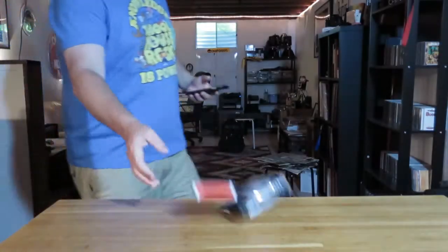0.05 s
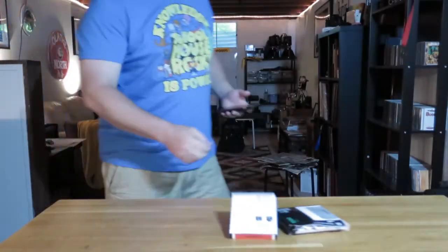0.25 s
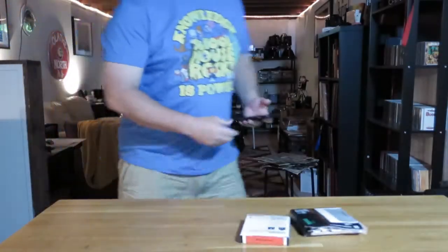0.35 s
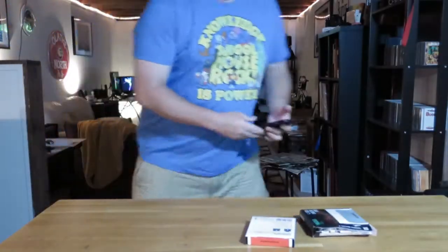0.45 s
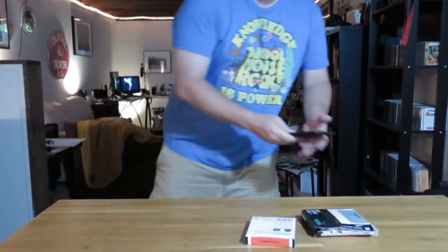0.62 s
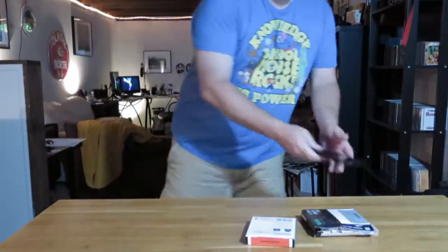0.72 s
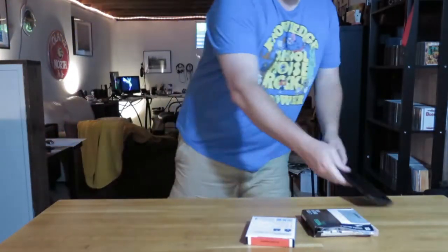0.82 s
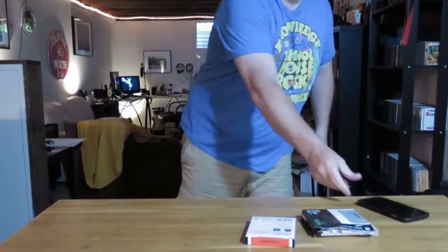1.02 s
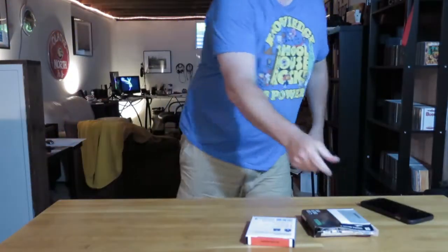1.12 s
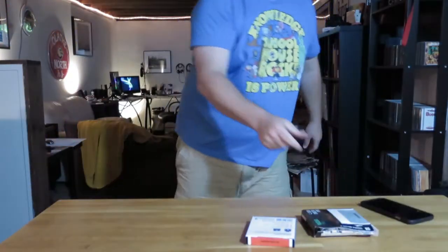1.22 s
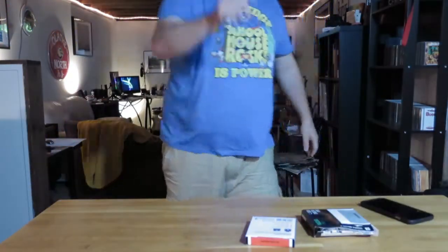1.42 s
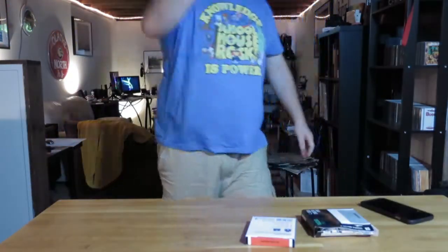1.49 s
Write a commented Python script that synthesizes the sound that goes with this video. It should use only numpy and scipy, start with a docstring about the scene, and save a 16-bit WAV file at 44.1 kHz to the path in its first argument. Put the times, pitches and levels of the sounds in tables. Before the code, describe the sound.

In a quiet, reverberant room, tossed boxes clatter onto a wooden table and a cardboard one falls flat. Then a phone is set on its edge and drops with a hard clack, with soft footsteps behind.

```python
"""Two small boxes land on a wooden table: one clips the top, both slap down, the cardboard one tips flat.
Then a phone is set on its edge, slid a little and let fall. Each contact is a click and a brief rattle,
coloured by the object; boxes and table top ring in damped modes. Behind them: the scuff of the toss,
soft footfalls, a ceiling echo, room reverberation and a quiet room tone."""
import sys
import numpy as np
from scipy import signal
from scipy.fft import rfft, irfft
from scipy.io import wavfile

SR = 44100
rng = np.random.default_rng(int(sys.argv[2]) if len(sys.argv) > 2 else 0)


def generate_wav(sig):
    """Save sig (samples, or channels by samples) to the path in sys.argv[1] as 16-bit PCM at SR."""
    pcm = np.round(np.clip(np.atleast_2d(sig).T, -1, 1) * 32767).astype(np.int16)
    wavfile.write(sys.argv[1], SR, pcm)


N = 68355
T = np.arange(N) / SR
FFT_SIZE = 2 ** 17
HZ = np.maximum(np.arange(FFT_SIZE // 2 + 1) * SR / FFT_SIZE, 1)
CUTOFF_HZ = 16000


# Box contacts. Each row: start in seconds, level in dB, brightness in Hz, rattle re click in dB,
# push on the modes in dB.
BOX_HITS = [(.2028, -21.5, 8970, 12, -22), (.2058, -17, 10010, 9.5, -29.5), (.2124, -25, 15910, 0, -31),
            (.2135, -10, 398, 1, -23), (.2251, -1, 13940, 13, -18), (.2285, -15.5, 9006, 2.5, -23.5),
            (.2311, -1, 2502, 5, 5.5), (.2332, 0, 3500, 2.5, -17), (.335, -19.5, 450, -19, -19),
            (.3375, -30, 15000, 14, -30), (.368, -51, 16000, 15, -43)]
# Clack spectrum. Each row: frequency in Hz, gain in dB.
BOX_EQ = [(25, 5), (70, 16), (130, 15), (230, 16), (400, 20.5), (700, 23.5), (1000, 18), (1550, 26),
          (1900, 19), (2150, 12), (2450, 20.5), (3350, 14.5), (3800, 12), (4150, 16.5), (5100, 10),
          (5800, 13), (6500, 5.5), (9500, 4), (12000, -0.5), (16000, -1.5)]
# Box and table-top resonances. Each row: frequency in Hz, peak gain in dB, T60 in seconds.
BOX_MODES = [(35, 6, 1.6), (146, 10.5, 0.082), (416.8, 27.5, 0.23), (521, 24, 0.074), (683, 19, 0.11),
             (667.5, 32.5, 0.2), (779, 23.5, 0.18), (1198, 22, 0.31), (1415, 26.5, 0.056), (1510, 27, 0.12),
             (1724, 28.5, 0.047), (2433, 22, 0.037), (2920, 20.5, 0.14)]
TABLETOP_MODES = [(77.5, 17, 0.42), (126, 13, .6), (281, 19, 0.34), (296, 18, 0.24), (365.5, 18, 0.42),
                  (550, 7.1, 0.49), (718, 19, 0.38), (750, 11, 0.41), (800, 15, 0.71), (833.5, 17, .3),
                  (1105, 18, .32), (1188, 22, 0.36), (1480, 26, .36), (1569, 25, 0.14)]

def boxes(table_db=-6, ring_room_db=-12):
    """Both boxes slap down, contents rattling; boxes and table top ring."""
    push = blows(BOX_HITS)
    body = ring(push, BOX_MODES)
    table = from_db(table_db) * ring(push, TABLETOP_MODES)
    slaps = clack(BOX_HITS, BOX_EQ, rattle_t60_s=.03, room_db=-2)
    return slaps + body + table + from_db(ring_room_db) * room(body)


# Carton contacts. Each row: start in seconds, level in dB, brightness in Hz, rattle re click in dB,
# push on the modes in dB.
CARTON_HITS = [(.4322, -21, 5000, 10, -20), (.4497, -3, 5000, -6, 0), (.4506, -4, 3000, 4, -18),
               (.4528, -6, 1200, 0, -18), (.4195, -31, 14000, 10, -40), (.444, -32, 16000, 12, -40),
               (.5098, -32, 15000, 12, -40), (.564, -39, 16000, 10, -45)]
# Knock spectrum. Each row: frequency in Hz, gain in dB.
CARTON_EQ = [(30, -22), (100, 3.5), (170, 16.5), (350, 8.5), (600, 17.5), (1000, 10.5), (1700, 13.5),
             (2100, 5.5), (2550, 11.5), (3200, 0.5), (4200, 7), (7000, -3.5), (15000, -6)]
# Carton resonances. Each row: frequency in Hz, peak gain in dB, T60 in seconds.
CARTON_BODY_MODES = [(33.4, 15, 0.69), (293, 16, 0.24), (540, 12, 0.043), (664, 16, .33), (691, 25.8, 0.51),
                     (1594, 21.9, 0.125), (2460, 12, 0.12), (2530, 12, 0.19)]

def carton(ring_room_db=-14):
    """The hollow cardboard box knocks, rocks and falls flat."""
    body = ring(blows(CARTON_HITS), CARTON_BODY_MODES)
    knocks = clack(CARTON_HITS, CARTON_EQ, rattle_t60_s=.025, room_db=-3.5)
    return knocks + body + from_db(ring_room_db) * room(body)


# Phone touches, drop and bounces. Each row: start in seconds, level in dB, brightness in Hz,
# rattle re click in dB, push on the modes in dB.
PHONE_CONTACTS = [(1.008, -34, 2420, 14, -29), (1.0475, -44, 5960, 16, -35), (1.1394, -17, 2800, 6, -20),
                  (1.1478, -22, 1200, 0, -28), (1.1644, -6, 10100, 11, -53.5), (1.1682, 1.5, 1660, 3.5, 2),
                  (1.1738, -5.5, 3950, 34, -20.5), (1.1754, 0.5, 12600, 1, -29)]
# Clack spectrum. Each row: frequency in Hz, gain in dB.
PHONE_EQ = [(30, -25), (80, -5), (170, -2), (240, -6.5), (330, 6), (800, 6), (1150, 1), (1600, 3),
            (2100, 1), (2900, -2.5), (4900, 4), (6300, -4), (9500, -6), (15000, -20.5)]

def phone(ring_room_db=-12):
    """The hard, heavy phone clacks and sets the table top ringing."""
    table = ring(blows(PHONE_CONTACTS), TABLETOP_MODES)
    clacks = clack(PHONE_CONTACTS, PHONE_EQ, rattle_t60_s=.0065, room_db=2, t60_scale=.91, tail_hz=6200)
    return clacks + table + from_db(ring_room_db) * room(table)


# Friction envelope. Each row: time in seconds, relative level in dB.
SLIDE_ENVELOPE = [(1.009, -49), (1.04, -65), (1.06, -54), (1.11, -55.5), (1.14, -59)]
# Friction spectrum. Each row: frequency in Hz, gain in dB.
SLIDE_EQ = [(100, -17), (500, 13.5), (1000, 9), (1600, 14.5), (2800, -1), (5000, -6.5), (8000, -12),
            (15000, -21)]

def slide(grain_db=4, gain_db=-13.5):
    """The phone's edge scrapes faintly over the wood: gated, grainy noise."""
    times_s, levels_db = np.transpose(SLIDE_ENVELOPE)
    grains = rng.standard_normal(N) * from_db(grain_db * rng.standard_normal(N))
    envelope = from_db(np.interp(T, times_s, levels_db) + gain_db)
    sliding = (T > times_s[0]) * (T < times_s[-1])
    return colour(grains / grains.std() * envelope * sliding, SLIDE_EQ)


# Scuffs. Each row: start in seconds, level in dB, brightness in Hz, rattle re click in dB.
SCUFF_HITS = [(.0, -29.5, 13660, 13.5), (.0112, -32, 5030, 0.5)]
# Scuff spectrum. Each row: frequency in Hz, gain in dB.
SCUFF_EQ = [(60, -7.5), (300, 9), (540, 18), (850, 3.5), (1500, 6), (2200, 1.5), (3500, 0), (6000, -0.5),
            (15000, -12)]

def toss():
    """Cardboard scuffs off the fingers, farther back in the room."""
    return clack(SCUFF_HITS, SCUFF_EQ, rattle_t60_s=.023, room_db=5)


# Footfalls. Each row: start in seconds, level in dB, brightness in Hz, rattle re click in dB.
STEP_HITS = [(.829, -5, 89, -6), (1.105, -14.5, 100, -7), (1.509, -20, 422, 7.5)]
# Thud spectrum. Each row: frequency in Hz, gain in dB.
STEP_EQ = [(15, -14.5), (40, 6), (100, -2.5), (220, -9.5), (480, 7.5), (1500, -34), (8000, -31)]

def steps():
    """Dull thuds of feet on the floor."""
    return clack(STEP_HITS, STEP_EQ, rattle_t60_s=.046, room_db=-3.5)


def clack(hits, eq, rattle_t60_s, room_db, t60_scale=1, tail_hz=CUTOFF_HZ):
    """Contacts and their reverberation, coloured by the object."""
    force = contacts(hits, rattle_t60_s)
    reflections = ceiling(force) + reverb(hits, t60_scale, tail_hz)
    return colour(force + from_db(room_db) * reflections, eq)


def contacts(hits, rattle_t60_s):
    """Each contact is a click and a brief rattle, both duller when the touch is soft."""
    force = np.zeros(N)
    click = T == 0
    for start_s, level_db, bright_hz, rattle_db, *_ in hits:
        rattle_gain = from_db(rattle_db)
        rattle = rattle_gain * rng.standard_normal(N) * decay(rattle_t60_s)
        pulse = (click + rattle) / np.hypot(1, rattle_gain)
        force += from_db(level_db) * delayed(lowpass(pulse, bright_hz), start_s)
    return force


def blows(hits):
    """Pulses that drive the modes: weak from a corner, strong from a flat face."""
    return sum(from_db(push_db) * delayed(lowpass(T == 0, bright_hz), start_s)
               for start_s, _, bright_hz, _, push_db in hits)


def ring(force, modes):
    """Parallel resonances, each with its own peak gain and decay."""
    out = np.zeros(N)
    for hz, peak_db, t60_s in modes:
        r = np.exp(-np.log(1000) / (t60_s * SR))
        feedback = [1, -2 * r * np.cos(2 * np.pi * hz / SR), r * r]
        out += from_db(peak_db) * (1 - r * r) / 2 * signal.lfilter([1, 0, -1], feedback, force + 1e-18)
    return out


def room(x):
    """Ceiling echo and reverberation of a ringing body."""
    impulse_response = reverb([(0, 0, CUTOFF_HZ)])
    return ceiling(x) + signal.fftconvolve(x, impulse_response)[:N]


def ceiling(x, delay_s=.0079, gain_db=-10.5, lowpass_hz=3500):
    """One dull echo off the low ceiling."""
    return from_db(gain_db) * delayed(lowpass(x, lowpass_hz), delay_s)


# Room decay. Each row: band centre in Hz, base T60 in seconds.
ROOM_BANDS = [(60, 0.54), (250, 0.56), (650, 0.56), (1500, 0.43), (3000, 0.42), (6000, 0.38), (10000, 0.46),
              (16000, 0.3)]
# Reverberation spectrum. Each row: frequency in Hz, gain in dB.
ROOM_EQ = [(40, -11), (200, -8.5), (600, -4.5), (1500, -5.5), (5000, -7.5), (15000, -4)]

def reverb(hits, t60_scale=1, tail_hz=CUTOFF_HZ, predelay_s=.0049, build_s=.0014, early_db=-1):
    """Each contact feeds early reflections and a diffuse tail whose treble dies first."""
    noise_spectrum = rfft(rng.standard_normal(N), FFT_SIZE)
    build = 1 - np.exp(-T / build_s)
    early = from_db(early_db) * decay(t60_s=.14)
    out = np.zeros(N)
    for hz, t60_s in ROOM_BANDS:
        band = at_hz([(centre_hz, centre_hz == hz) for centre_hz, _ in ROOM_BANDS], HZ)
        late = decay(t60_s * t60_scale) / np.hypot(1, hz / tail_hz)
        hit_energy = build ** 2 * (early ** 2 + late ** 2)
        energy = np.zeros(N)
        for start_s, level_db, bright_hz, *_ in hits:
            gain = from_db(level_db) / (1 + (hz / bright_hz) ** 2)
            energy += gain ** 2 * delayed(hit_energy, start_s + predelay_s)
        out += irfft(noise_spectrum * band)[:N] * np.sqrt(energy)
    return colour(out, ROOM_EQ)


# Room tone spectrum. Each row: frequency in Hz, gain in dB.
ROOM_TONE_EQ = [(25, -45), (60, -53), (125, -52.5), (200, -58.5), (500, -62), (1000, -71), (1600, -69),
                (2100, -71), (4500, -74), (7000, -81.5), (15000, -90)]

def room_tone():
    """Quiet, steady noise, strongest in the bass."""
    return colour(rng.standard_normal(N), ROOM_TONE_EQ)


def colour(x, eq):
    """Minimum-phase filter with the given spectrum."""
    cepstrum = irfft(np.log(from_db(at_hz(eq, HZ))))
    cepstrum[1:FFT_SIZE // 2] *= 2
    cepstrum[FFT_SIZE // 2 + 1:] = 0
    return irfft(rfft(x, FFT_SIZE) * np.exp(rfft(cepstrum)))[:N]


def lowpass(x, hz):
    """Two-pole low-pass."""
    r = np.exp(-2 * np.pi * hz / SR)
    return signal.lfilter([(1 - r) ** 2], [1, -2 * r, r * r], x + 1e-18)


def decay(t60_s):
    """Exponential decay of unit energy."""
    envelope = np.exp(-np.log(1000) * T / t60_s)
    return envelope / np.sqrt(np.sum(envelope ** 2))


def delayed(x, delay_s):
    """Delay, cut to N samples."""
    return np.concatenate([np.zeros(int(delay_s * SR)), x])[:N]


def at_hz(points, hz):
    """Interpolate on a log-frequency axis."""
    points_hz, values = np.transpose(points)
    return np.interp(np.log(hz), np.log(points_hz), values)


def from_db(db):
    """Decibels to gain."""
    return 10 ** (np.asarray(db) / 20)


def scene():
    """Objects and footfalls over room tone, mono."""
    return (toss() + boxes() + carton() + phone() + slide() + steps() + room_tone())[None]


def record(dry, clip_level=.52):
    """Soft clip, then a steep low-pass."""
    rounded = dry / (1 + (dry / clip_level) ** 4) ** (1 / 4)
    top_cut = signal.ellip(10, .1, 80, CUTOFF_HZ, fs=SR, output="sos")
    return signal.sosfilt(top_cut, rounded)


dry = scene()
out = record(dry)
generate_wav(out)
```